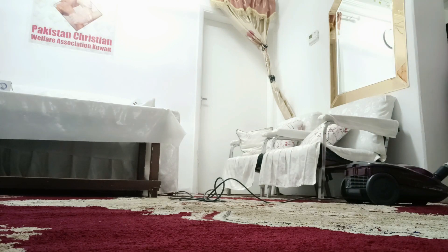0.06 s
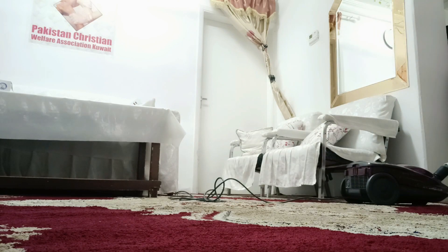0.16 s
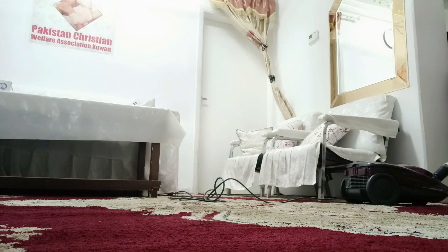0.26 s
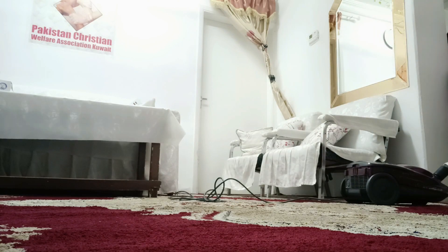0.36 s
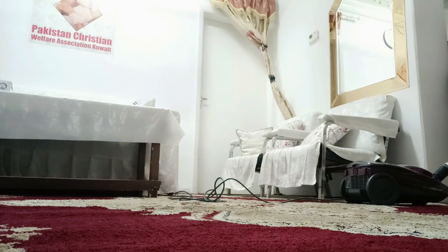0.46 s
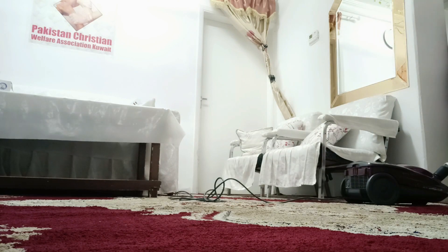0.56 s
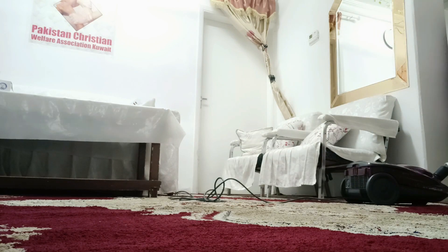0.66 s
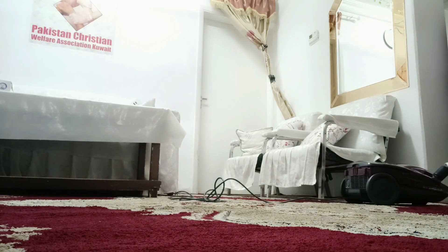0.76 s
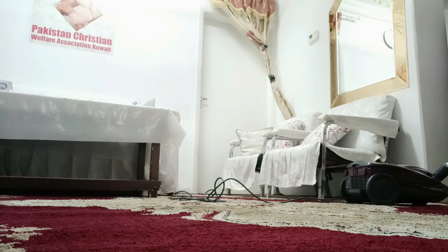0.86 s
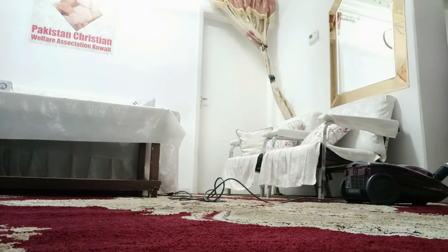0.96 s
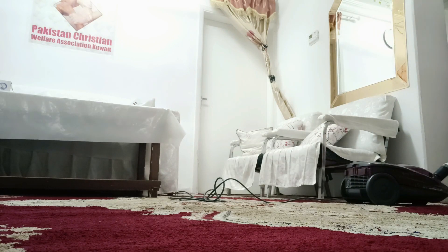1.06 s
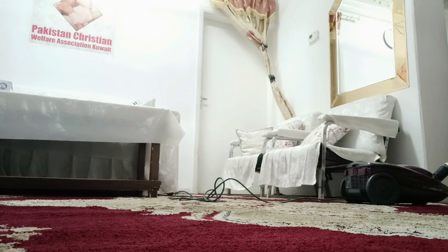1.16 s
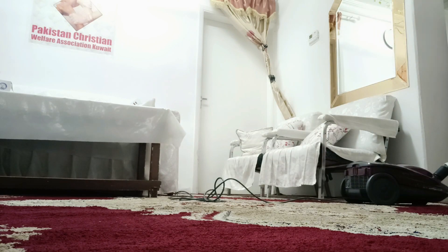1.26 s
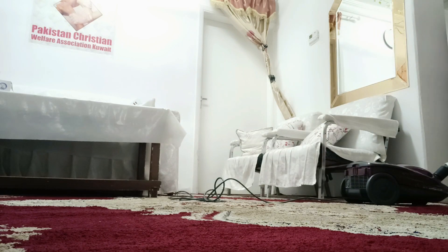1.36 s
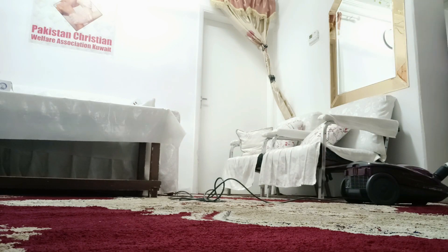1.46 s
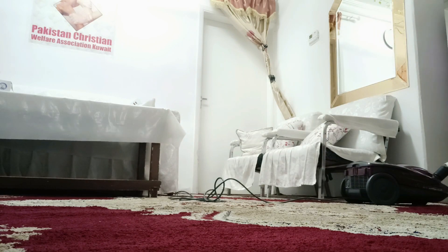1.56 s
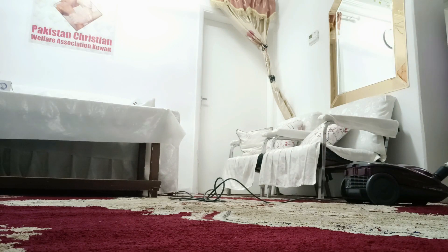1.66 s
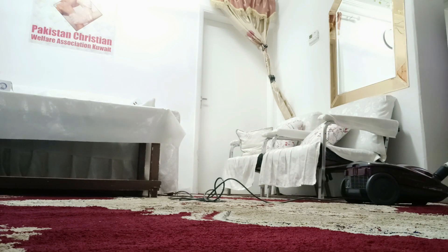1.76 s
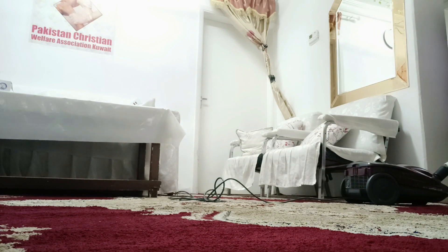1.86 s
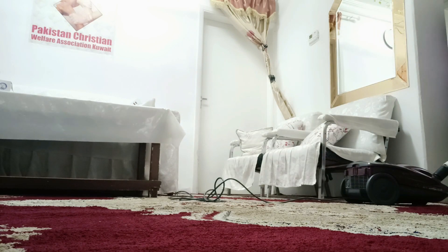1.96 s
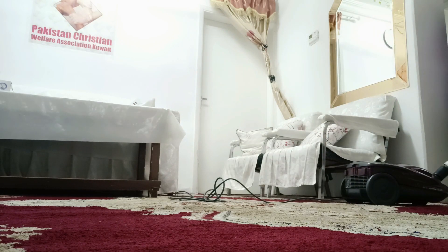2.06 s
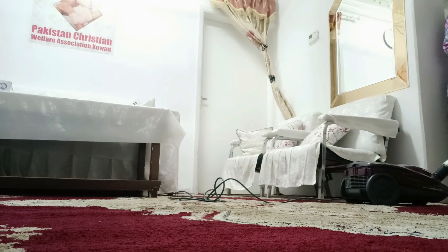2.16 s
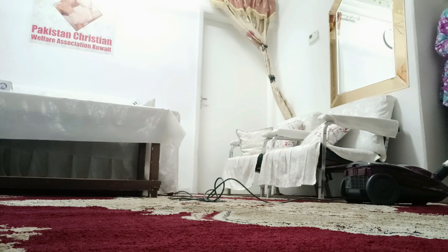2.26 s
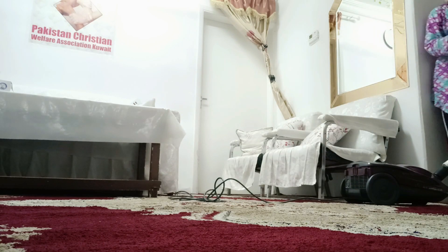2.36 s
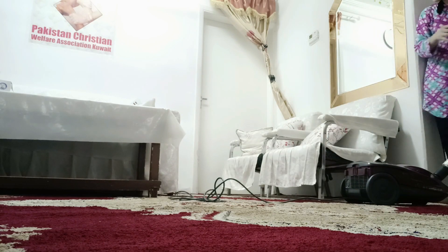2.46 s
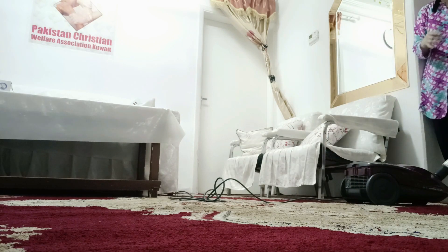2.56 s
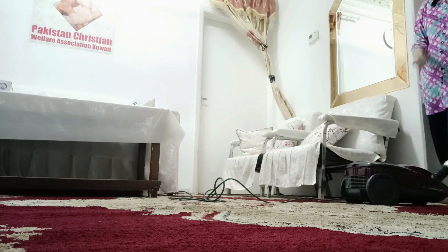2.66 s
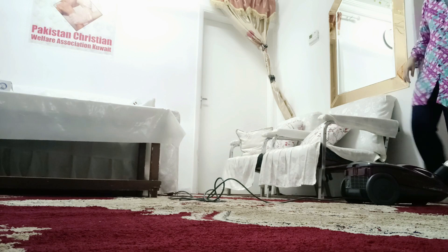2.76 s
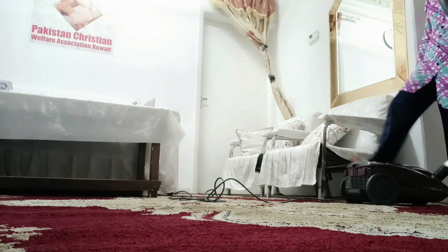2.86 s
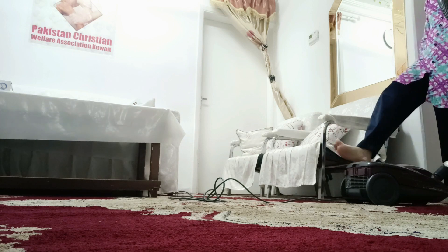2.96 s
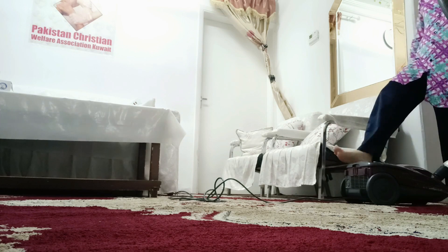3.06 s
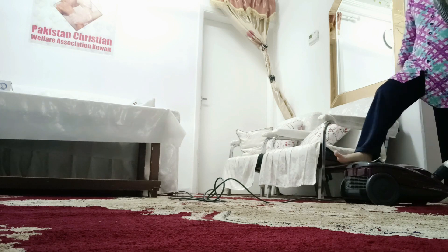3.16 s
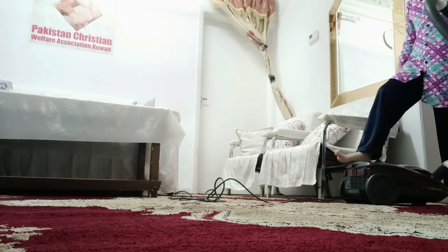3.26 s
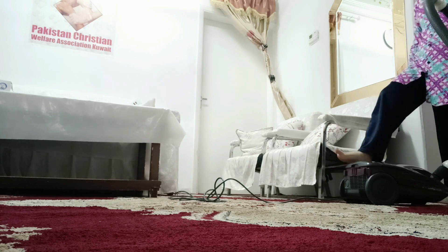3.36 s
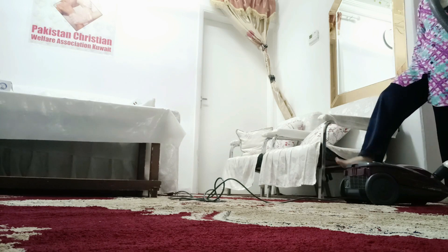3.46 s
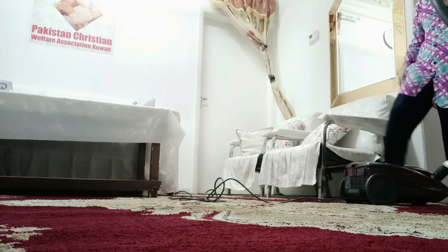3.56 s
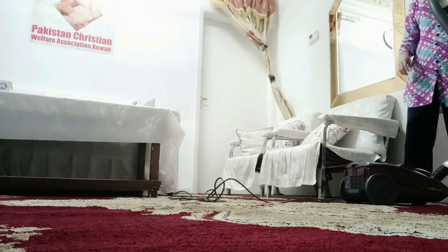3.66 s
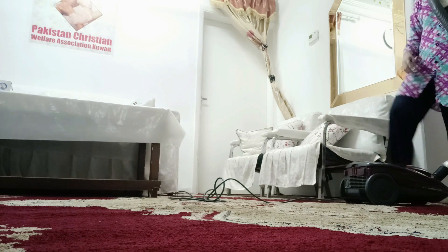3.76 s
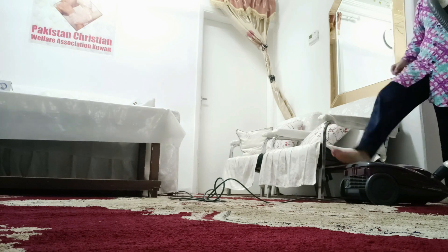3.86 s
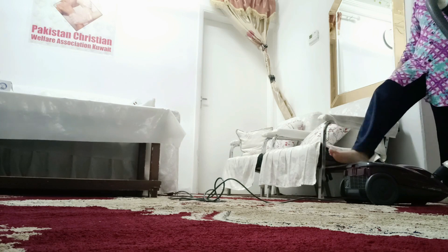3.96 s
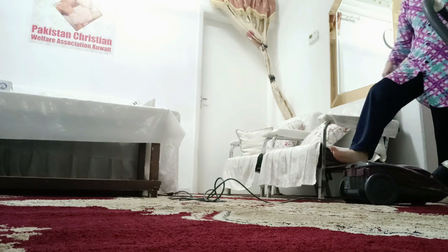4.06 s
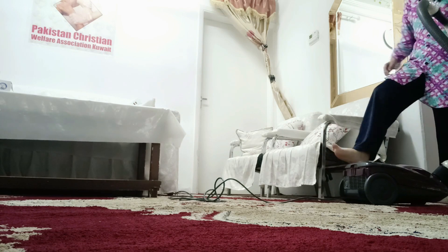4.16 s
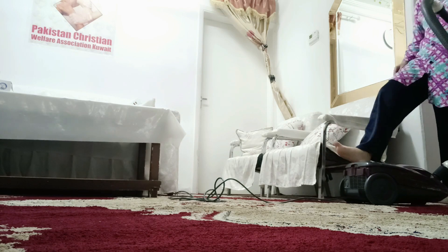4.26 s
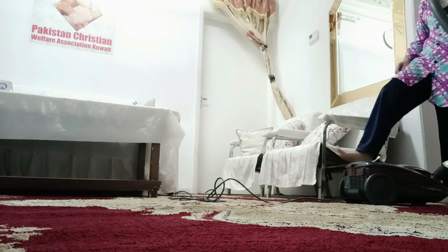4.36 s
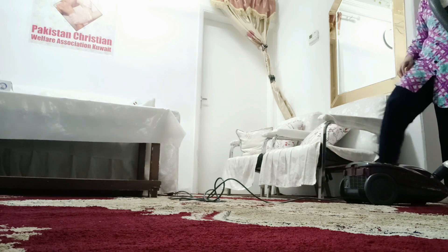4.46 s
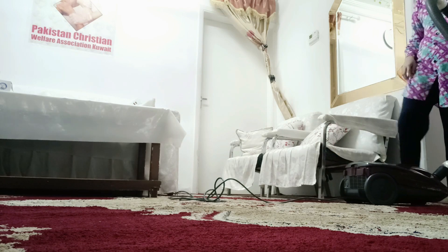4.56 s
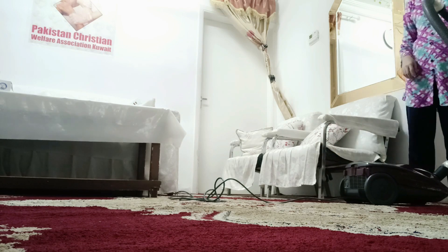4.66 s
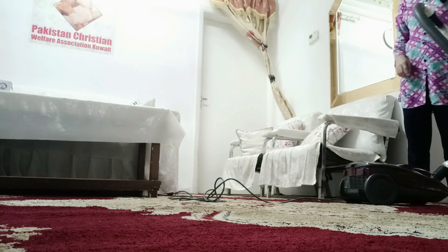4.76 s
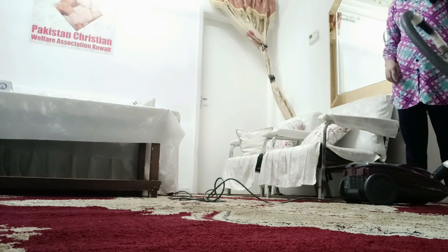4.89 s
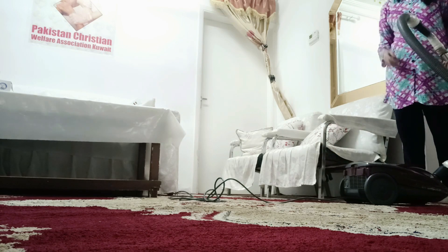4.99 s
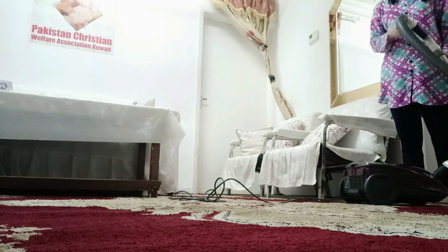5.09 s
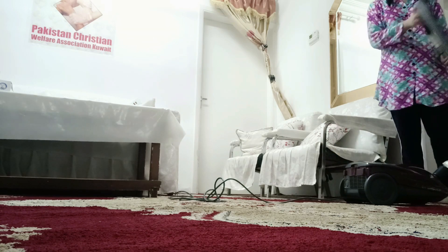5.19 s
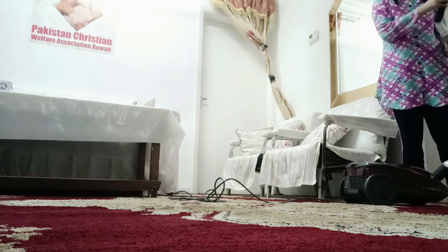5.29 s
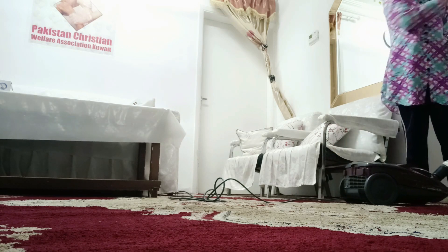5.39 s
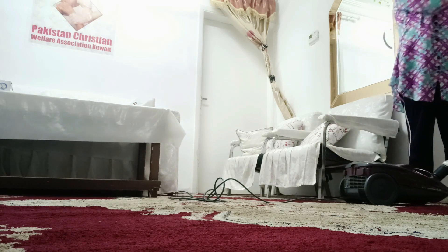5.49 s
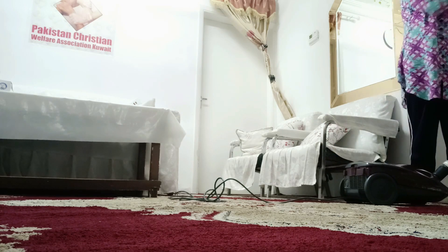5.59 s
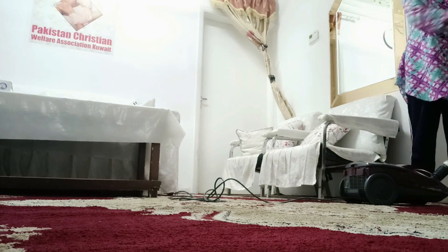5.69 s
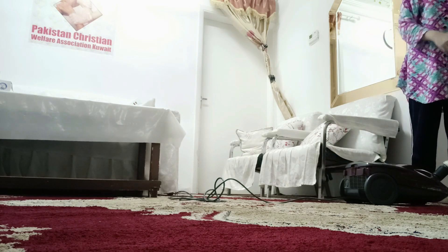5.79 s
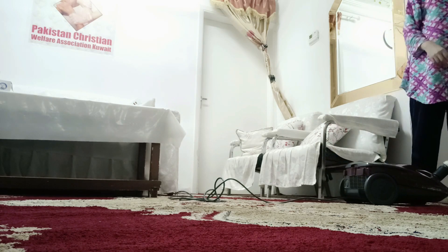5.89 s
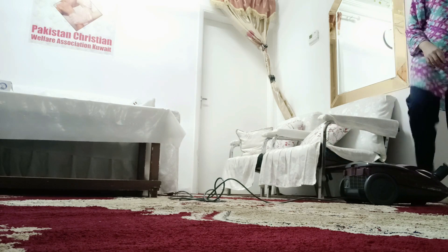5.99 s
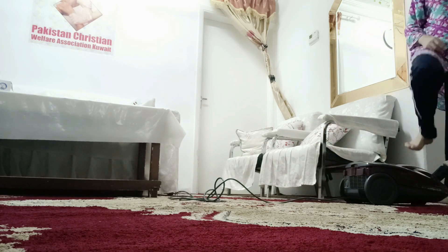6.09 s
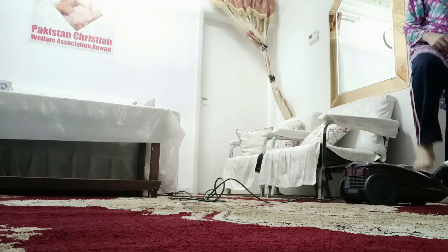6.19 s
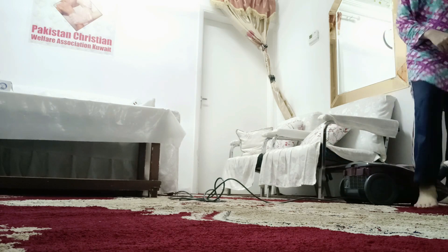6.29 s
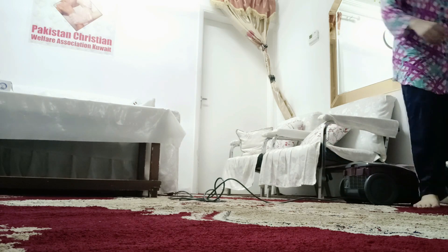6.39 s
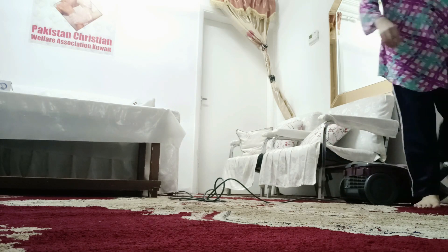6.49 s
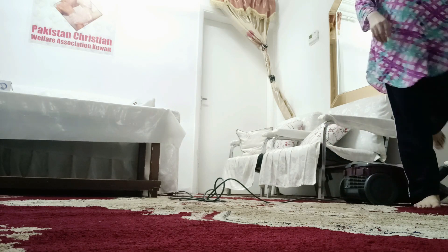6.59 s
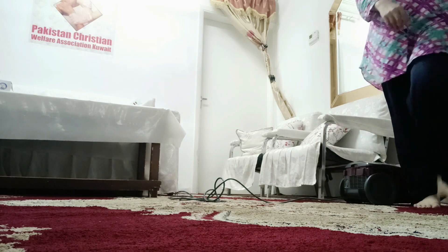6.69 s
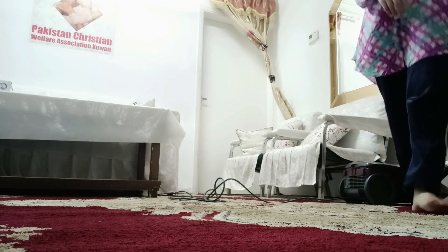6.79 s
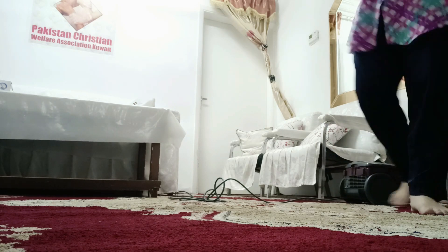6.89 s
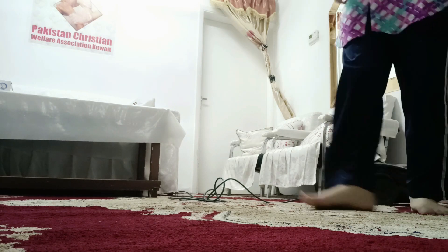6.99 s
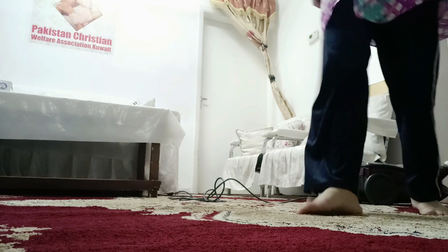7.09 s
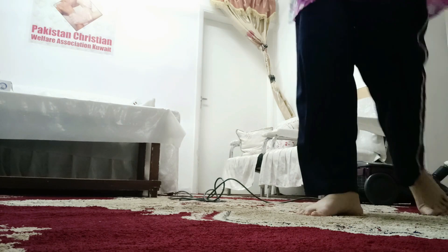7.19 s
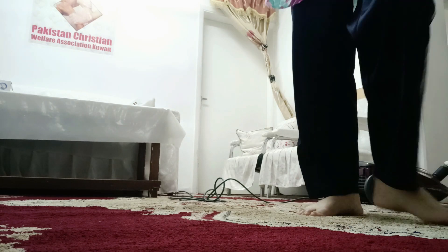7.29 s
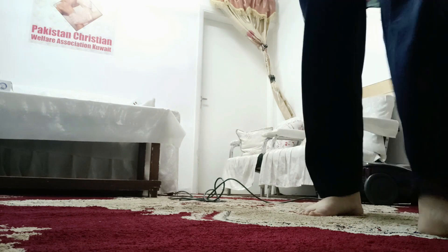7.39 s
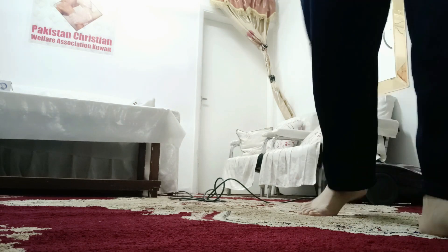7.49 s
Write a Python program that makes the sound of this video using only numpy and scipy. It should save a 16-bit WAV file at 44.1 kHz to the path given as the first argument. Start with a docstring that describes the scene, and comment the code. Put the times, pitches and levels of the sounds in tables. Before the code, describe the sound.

Loud steady vacuum hum with hissing air, then power cut; the pitch slides down and fades, with faint hose scuffs and soft barefoot steps.

```python
"""A canister vacuum cleaner runs in a carpeted room: a loud hum, once per turn of its shaft, over roaring, hissing air.
It is switched off at 4.2 s; the rotor coasts against drag and friction, and its speed drives every motor and air sound.
The hum slides down through the room's standing waves, its overtones through the housing's resonances, and the
impeller whines at its blade rate. The hose is handled and bare feet pad over the carpet: short bursts of noise.
Faint room tone lies beneath. The two microphones colour the treble differently."""
import sys
import numpy as np
from scipy import signal
from scipy.fft import rfft, irfft, next_fast_len
from scipy.io import wavfile
from scipy.ndimage import map_coordinates

SR = 44100
rng = np.random.default_rng(int(sys.argv[2]) if len(sys.argv) > 2 else 0)


def waveform_to_disk(signal):
    """Save audio, clipped to [-1, 1], as 16-bit WAV at the path in sys.argv[1]."""
    frames = np.transpose(np.atleast_2d(signal))
    scaled = np.clip(frames, -1, 1) * 32767
    samples = np.round(scaled).astype(np.int16)
    wavfile.write(sys.argv[1], SR, samples)


N = 332550
TIME = np.arange(N) / SR  # seconds

# How fast the shaft turns under power, wandering with the load. Each row: time in seconds, turns a second.
POWERED_SPEED = [(0, 440.0), (0.7, 437.8), (1.08, 439.6), (1.25, 441.8), (1.6, 442.6), (1.7, 439.9),
                 (1.95, 437.8), (2.6, 437.4), (2.9, 439.6), (3.2, 441.9), (3.6, 442.3), (3.83, 441.1),
                 (4.1, 442.3), (4.2, 441)]
FULL_HZ = 441  # full speed, turns a second
OFF_S = 4.187  # switch-off, seconds
DRAG_S = 1.358  # air drag alone would halve the speed in this many seconds
STOP_S = 7.9  # friction alone would stop the rotor after this many seconds

# Speeds at which the rotor rocks on its mounts.
# Each row: turns a second, width in Hz, lift of the hum in dB, lift of the rattle in dB.
CRITICAL_SPEEDS = [(187.6, 19, 14.5, 4.5), (141, 7, 6.5, -0.5), (116, 12, 11, 10)]

# Moments when the hum stutters. Each row: time in seconds, dip in dB.
HUM_STUTTERS = [(0.218, -2.5), (.615, -8), (1.624, -3.5), (1.877, -6), (2.085, -14), (2.246, -9),
                (2.606, -3.5), (2.671, -16), (2.938, -3.5), (2.997, -2.5), (3.091, -4.5), (3.292, -9),
                (3.742, -2)]
HUM_DB, HUM_POWER = -13.5, 4.6  # direct hum at full speed; it grows as this power of the speed
LOAD_DB_PER_HZ = 0.43  # the hum swells as the load pulls the speed down

# Standing waves of the room that the hum slides through.
# Each row: Hz, width in Hz, gain at the left microphone, gain at the right (1 = the direct sound, negative = antiphase).
STANDING_WAVES = [(446.4, 11.0, -0.61, 0.21), (422.0, 18.4, -0.89, -1.17), (405.7, 12.6, 1.04, -1.98),
                  (373.4, 11.6, -2.06, 2.02), (364.7, 15.2, -0.63, -0.85), (333.8, 18.2, -0.91, -0.78),
                  (309.5, 12.4, 0.66, -0.22), (294.7, 12.0, -0.56, -1.64), (275.1, 18.7, -0.15, -0.58),
                  (234.6, 12.8, -2.87, 0.32), (214.5, 20.2, -0.2, -2.06)]

# Overtones that shake the housing. Each row: multiple of the shaft rate, relative level in dB.
SHAFT_MULTIPLES = [(2, 2), (3, 0.5), (4, 0), (5, -8.5), (6, -7), (7, -17.5)]
# How strongly the housing answers each pitch. Each row: Hz, gain in dB.
HOUSING_RESPONSE = [(150, -13), (330, -7), (440, -4.5), (480, 6.5), (515, -2.5), (580, -0.5), (670, -6),
                    (810, 1.5), (885, -4), (1000, -8.5), (1200, -4), (1320, -10.5), (1430, 2), (1620, -22),
                    (2200, -7), (2900, -29)]

BLADES = 9
WHINE_DB, OCTAVE_DB = -44.5, -19  # blade tone before the casing, and its octave relative to it
WALL_S, WALL_GAIN = 0.0078, 0.39  # reflection from the near wall: delay in seconds, strength
# What the casing lets out of the whine. Each row: Hz, gain in dB.
CASING_RESPONSE = [(800, -28), (1120, -21), (1220, -7.5), (1330, -7), (1440, 5.5), (1680, -4), (1950, -3),
                   (2100, -8.5), (2460, -5.5), (2620, -19), (3300, -26), (3950, -16), (4300, -19),
                   (5200, -16), (7200, -3.5), (8200, -13.5)]
# A narrow gap in what the casing lets out. Each row: Hz, width in Hz, lift in dB.
CASING_GAP = [(1498, 40, -21.5)]

# Colour of the bearing rumble. Each row: Hz, relative level in dB per Hz.
RUMBLE_COLOUR = [(60, -26), (105, -27), (140, -2.5), (220, -2.5), (400, -10), (560, -1), (700, -3),
                 (850, -13), (1000, -21), (1400, -11.5), (2000, -34), (3000, -47.5), (6000, -70)]
# Resonances of the canister's shell. Each row: Hz, width in Hz, lift in dB.
SHELL_RESONANCES = [(325, 26, 7.5), (476, 140, 14), (600, 41, 4), (860, 79, 15.5)]

# Colour of the air roaring in the canister. Each row: Hz, relative level in dB per Hz.
ROAR_COLOUR = [(60, -29.5), (105, -27), (135, -15.5), (170, -7), (225, -4.5), (280, -8), (390, -5.5),
               (500, 1), (680, -8.5), (790, -7), (960, -9.5), (1400, -44)]
# Resonances of the air in the canister. Each row: Hz, width in Hz, lift in dB.
CAVITY_RESONANCES = [(221.4, 23, 8.5), (537, 48, 4), (798, 32, 3.5)]
# Colour of the air rushing in the hose. Each row: Hz, relative level in dB per Hz.
RUSH_COLOUR = [(600, -27), (980, -13.5), (1220, -2.5), (1500, -9.5), (1750, -11.5), (2200, -16.5),
               (3000, -21), (5000, -44.5)]
# Resonances of the hose. Each row: Hz, width in Hz, lift in dB.
HOSE_RESONANCES = [(1209, 43, 4), (1360, 21, -4), (1435, 29, 9), (1538, 51, 6), (1660, 36, 5)]
# Colour of the hissing exhaust jet. Each row: Hz, relative level in dB per Hz.
HISS_COLOUR = [(1200, -18), (2400, -8), (3300, -2), (4400, -1), (5900, -2), (6950, 0.5), (7700, -2.5),
               (8500, -5), (9700, -4), (11300, -9), (12700, -4.5), (13800, -13), (15400, -9)]
# Resonances of the air passages. Each row: Hz, width in Hz, lift in dB.
PASSAGE_RESONANCES = [(2191, 25, 10), (3623, 35, 8), (3941, 25, 9), (4920, 25, 6), (5270, 25, 5),
                      (6907, 35, 6), (8888, 25, 6), (10605, 35, 9)]
# Colour of the exhaust grille's ring. Each row: Hz, relative level in dB per Hz.
GRILLE_COLOUR = [(2500, -23), (3350, -21.5), (3620, 1), (3900, -19), (4250, -11), (4600, -26),
                 (6000, -15.5), (6700, -2), (7150, 2.5), (7600, -15.5), (8600, -21), (9700, -10),
                 (10800, -28.5), (15000, -29.5)]

# Scuffs of the plastic hose.
# Each row: peak time in seconds, level in dB, seconds to rise by 60 dB, seconds to fall by 60 dB.
HOSE_SCUFFS = [(5.443, -45, 0.025, 0.065), (5.526, -44.5, 0.026, .08), (5.634, -49.5, 0.016, 0.055),
               (5.765, -57, 0.022, 0.056), (5.847, -61.5, .02, 0.047), (6.42, -51, 0.079, .1)]
# Colour of the scuffing plastic. Each row: Hz, relative level in dB per Hz.
PLASTIC_COLOUR = [(300, -5), (1500, 5.5), (2800, -7.5), (4200, -5), (5400, -5.5), (6800, 2.5), (8000, -6),
                  (10000, -9), (12000, -21), (15000, -21.5)]
# Footfalls. Each row: peak time in seconds, thud level in dB, brush of the sole in dB relative to the thud.
FOOTSTEPS = [(6.09, -44, -12.5), (6.738, -63, -22), (6.85, -54.5, -25), (7.16, -70, -23),
             (7.285, -52.5, -16), (7.46, -49.5, -33)]
# Colour of the thud on the carpet. Each row: Hz, relative level in dB per Hz.
THUD_COLOUR = [(40, -14), (110, 3), (220, 5), (480, -5), (900, -35), (2000, -34), (5000, -39.5)]
# Colour of the sole brushing the pile. Each row: Hz, relative level in dB per Hz.
BRUSH_COLOUR = [(500, 2), (1000, 0), (1600, 13), (2300, -10), (3200, -14), (8000, -15), (15000, -37)]

# Colour of the room tone. Each row: Hz, relative level in dB per Hz.
QUIET_COLOUR = [(15, -0.5), (36, -4.5), (55, -10), (100, -9), (200, -3), (500, -22), (1500, -33.5),
                (4000, -50), (15000, -57)]
# How alike noise is at the two microphones. Each row: Hz, likeness (1 = the same, 0 = unrelated).
LEFT_RIGHT_LIKENESS = [(40, 0.8), (120, 0.37), (230, 0.24), (600, 0.021), (1500, 0), (15000, 0.0053)]
# How long the room rings. Each row: Hz, seconds to fall by 60 dB.
ROOM_DECAY = [(150, 0.67), (1000, 0.44), (10000, 0.12)]
# Colour of the left microphone. Each row: Hz, gain in dB.
LEFT_RESPONSE = [(400, 0.5), (1000, 0), (1600, -0.5), (2500, -4), (4000, -12), (5500, -9), (6300, -20.5),
                 (6800, -35.5), (7400, -16), (8100, -7), (9200, 0.5), (11000, -2.5), (13200, -6),
                 (14200, -21.5)]
# Colour of the right microphone. Each row: Hz, gain in dB.
RIGHT_RESPONSE = [(400, 0.5), (1000, -2), (1600, -7.5), (2500, -5), (4000, -1), (7000, 1), (8000, -4.5),
                  (9000, -7.5), (9500, -39.5), (10300, -30), (10700, -16), (11900, -9), (14000, 2.5)]
TOP_HZ = 15500  # nothing is kept from here up


def powered_speed():
    """Turns a second set by motor and load; the last value is held."""
    seconds, turns = np.transpose(POWERED_SPEED)
    return np.interp(TIME, seconds, turns)


def speed():
    """Shaft turns a second: held by the motor, then coasting against air drag and friction."""
    coast_s = np.maximum(TIME - OFF_S, 0)
    return powered_speed() * (1 - coast_s / STOP_S) / (1 + coast_s / DRAG_S)


def shaft(jitter):
    """Shaft angle in radians, the running sum of the speed, which trembles a little."""
    trembling = speed() * (1 + jitter * wobble(45))
    return 2 * np.pi * np.cumsum(trembling) / SR


def rocking(rattle):
    """Decibels added at the critical speeds, to the rattle or to the hum."""
    peaks = [(hz, width, rattle_db if rattle else hum_db)
             for hz, width, hum_db, rattle_db in CRITICAL_SPEEDS]
    return lift(peaks, speed())


def vibration(level_db, knee_hz, power):
    """Gain of a shaking part: even at high speed, dying as a power of the speed below the knee."""
    return amp(level_db) / np.hypot(1, (knee_hz / speed()) ** power)


def hum(stutter_s=0.03, waver_db=0.32):
    """The once-a-turn tone of the unbalanced rotor, heard directly and through the room's standing waves."""
    tone = np.exp(1j * shaft(jitter=0.0005))  # complex, so that its phase can be turned
    # at each stutter the tone fades over into itself out of step, and so dips
    ways = rng.choice([-1, 1], len(HUM_STUTTERS))
    for (s, dip_db), way in zip(HUM_STUTTERS, ways):
        slip = 2 * way * np.arccos(min(amp(dip_db), 1))
        progress = np.clip((TIME - s) / stutter_s, -0.5, 0.5)
        fade = (1 + np.sin(np.pi * progress)) / 2
        tone *= 1 - fade + fade * np.exp(1j * slip)

    hz = speed()
    load_db = LOAD_DB_PER_HZ * (FULL_HZ - powered_speed())
    level_db = load_db + rocking(rattle=False) + waver_db * wobble(7)
    tone *= np.sqrt(2) * amp(level_db) * (hz / FULL_HZ) ** HUM_POWER

    standing = np.zeros((2, N), complex)
    for centre, width, *gains in STANDING_WAVES:
        damping = 1j * hz * width
        resonance = damping / (centre ** 2 - hz ** 2 + damping)
        standing += np.outer(gains, resonance)
    return amp(HUM_DB) * (tone * (1 + standing)).real


def overtones(jitter, flutter_db):
    """Shaft multiples; each swells as it slides through a resonance of the housing."""
    angle = shaft(jitter)
    tones = sum(amp(db + flutter_db * wobble(14)) * np.sin(multiple * angle)
                for multiple, db in SHAFT_MULTIPLES)
    gain = vibration(-40.5 + rocking(rattle=True), knee_hz=229.7, power=4.16)
    return np.sqrt(2) * gain * filtered(tones, lambda hz: amp(along(HOUSING_RESPONSE, hz)))


def impeller(jitter, flutter_db):
    """Blade tone and octave, loudest in the casing's pass band, beating with their reflection as they fall."""
    angle = BLADES * shaft(jitter)
    tones = np.sqrt(2) * (np.sin(angle) + amp(OCTAVE_DB) * np.sin(2 * angle))
    gain = vibration(WHINE_DB + flutter_db * wobble(22), knee_hz=115, power=9.8)

    def casing_and_wall(hz):
        casing = amp(along(CASING_RESPONSE, hz) + lift(CASING_GAP, hz))
        wall = 1 + WALL_GAIN * np.exp(-2j * np.pi * hz * WALL_S)
        return casing * wall
    return filtered(gain * tones, casing_and_wall)


def bearings(uneven_db=1.7):
    """The bearings rumble unevenly in the shell, fading as the rotor slows."""
    gain = vibration(-44.5 + rocking(rattle=True) + uneven_db * wobble(16), knee_hz=150, power=3.3)
    return gain * noise(RUMBLE_COLOUR, ripple_db=2.5, peaks=SHELL_RESONANCES)


def flow(full_db, power, gust_db):
    """Gain of an air noise: a power of the shaft speed, never quite steady."""
    gusts = wobble(4.14) + wobble(15)
    return amp(full_db + gust_db * gusts) * (speed() / FULL_HZ) ** power


def air():
    """Turbulence: a roar in the canister, a rush in the hose, and the exhaust jet hissing through its grille."""
    roar = flow(full_db=-30.0, power=1.91, gust_db=1.14) * noise(ROAR_COLOUR, 0.5, CAVITY_RESONANCES)
    rush = flow(full_db=-33.0, power=2.16, gust_db=0.34) * noise(RUSH_COLOUR, 2.0, HOSE_RESONANCES)
    hiss = flow(full_db=-40.5, power=3.0, gust_db=0.35) * noise(HISS_COLOUR, 2.5, PASSAGE_RESONANCES)
    ring = flow(full_db=-47.5, power=2.53, gust_db=1.5) * noise(GRILLE_COLOUR, 1.5)
    return roar + rush + hiss + ring


def burst(s, rise, t60):
    """Envelope of a soft contact that peaks at s, rising and falling by 60 dB in the given seconds."""
    return amp(-60 * np.maximum((s - TIME) / rise, (TIME - s) / t60))


def handling():
    """The plastic hose scuffs; bare feet land on the carpet and brush its pile."""
    scuff_level = sum(amp(db) * burst(s, rise, t60) for s, db, rise, t60 in HOSE_SCUFFS)
    thud_level = sum(amp(db) * burst(s, 0.04, 0.17) for s, db, brush_db in FOOTSTEPS)
    brush_level = sum(amp(db + brush_db) * burst(s, 0.09, 0.2) for s, db, brush_db in FOOTSTEPS)
    scuffs = scuff_level * noise(PLASTIC_COLOUR)
    thuds = thud_level * noise(THUD_COLOUR)
    brushes = brush_level * noise(BRUSH_COLOUR)
    return room(scuffs + thuds + brushes, wet_db=-7.5)


def background(drone_hz=37.0):
    """Room tone, a soft noise, with a faint deep drone that wavers in level and phase."""
    drone = amp(-62.5 + wobble(3)) * np.sin(2 * np.pi * drone_hz * TIME + 0.3 * wobble(4))
    return drone + amp(-59.5) * noise(QUIET_COLOUR)


def room(x, wet_db):
    """Direct sound plus a diffuse tail for each microphone, at about the same total power."""
    hz, t, z = signal.stft(rng.standard_normal((2, SR // 2)), SR, nperseg=256)
    decay = amp(-60 * t / along(ROOM_DECAY, hz)[:, None])
    tail = signal.istft(z * decay, SR, nperseg=256)[1]
    tail = tail / np.linalg.norm(tail[0])
    wet = signal.fftconvolve(np.atleast_2d(x), tail, axes=1)[:, :N]
    return (x + amp(wet_db) * wet) / np.hypot(1, amp(wet_db))


def noise(spectrum, ripple_db=0, peaks=()):
    """Stereo noise of rms 1, with narrow resonances and the fixed ripple of standing waves."""
    def colour(hz):
        grid = np.arange(0, SR / 2, 22)  # a random ripple value every 22 Hz
        ripple = np.array([np.interp(hz, grid, r) for r in rng.standard_normal((2, len(grid)))])
        level = amp(along(spectrum, hz) + lift(peaks, hz) + ripple_db * ripple)
        # sharing the power between mid and side sets the left-right likeness
        turn = np.arccos(np.clip(along(LEFT_RIGHT_LIKENESS, hz), -1, 1)) / 2
        return level * [np.cos(turn), np.sin(turn)]
    mid, side = filtered(rng.standard_normal((2, N)), colour)
    return unit(np.array([mid + side, mid - side]))


def filtered(x, response):
    """x times a response of frequency."""
    m = next_fast_len(N + SR // 2)  # spare room keeps the end from wrapping onto the start
    hz = np.fft.rfftfreq(m, 1 / SR)
    return irfft(rfft(x, m) * response(hz), m)[..., :N]


def lift(peaks, hz):
    """Decibels added at hz by resonances, each a (Hz, width Hz, dB) row."""
    return sum(db / (1 + (2 * (hz - centre) / width) ** 2) for centre, width, db in peaks)


def along(points, hz):
    """Read (Hz, value) points on a log frequency axis."""
    f, v = np.transpose(points)
    return np.interp(np.log(hz + 1), np.log(f + 1), v)


def wobble(rate):
    """A smooth random curve through `rate` random points a second."""
    points = rng.standard_normal(int(N * rate / SR) + 4)
    return map_coordinates(points, [TIME * rate])


def amp(db):
    """Decibels to gain."""
    return 10 ** (np.asarray(db) / 20)


def unit(x):
    """Scale to rms 1."""
    return x / np.sqrt(np.mean(x ** 2) + 1e-20)


def scene():
    """Motor, air and the person, over the room tone."""
    shake = room(overtones(jitter=0.0028, flutter_db=2.5), wet_db=0.5)
    whine = room(impeller(jitter=0.0011, flutter_db=2), wet_db=-4.5)
    return hum() + shake + whine + bearings() + air() + handling() + background()


def record(dry):
    """Each microphone has its own colour; nothing is kept above the band limit."""
    coloured = filtered(dry, lambda hz: amp([along(LEFT_RESPONSE, hz), along(RIGHT_RESPONSE, hz)]))
    return filtered(coloured, lambda hz: hz < TOP_HZ)


dry = scene()
out = record(dry)
waveform_to_disk(out)
```